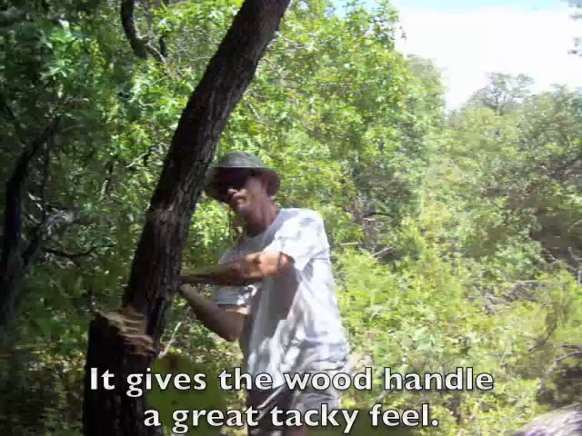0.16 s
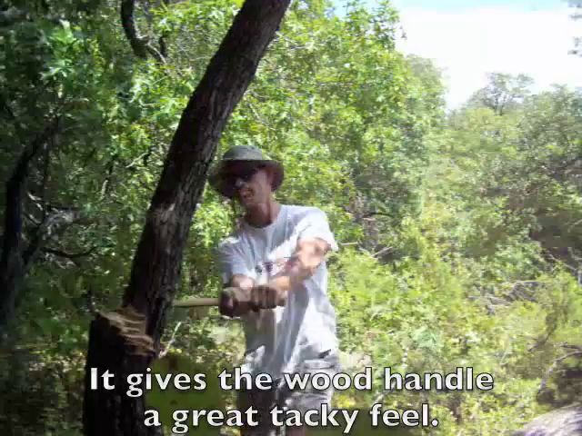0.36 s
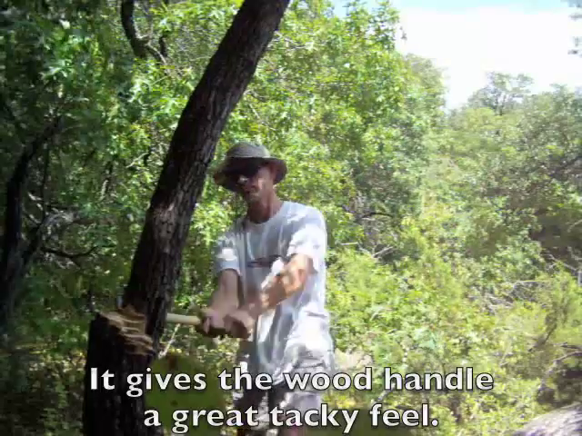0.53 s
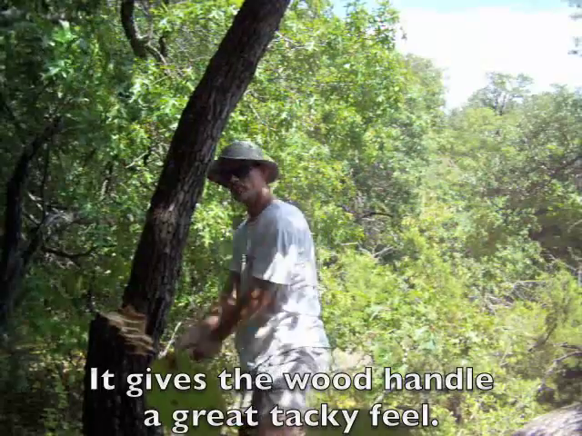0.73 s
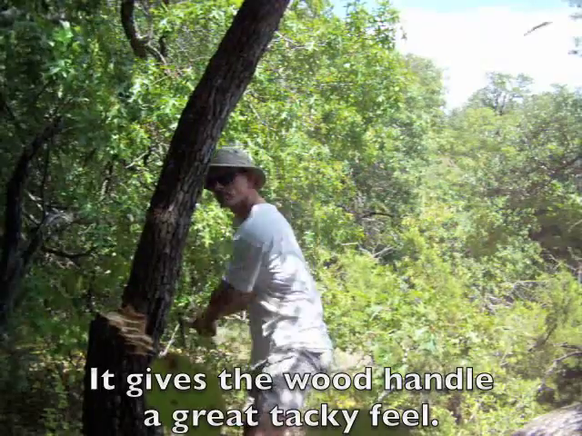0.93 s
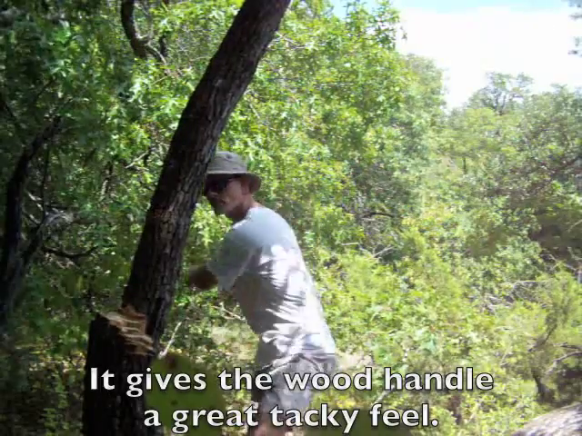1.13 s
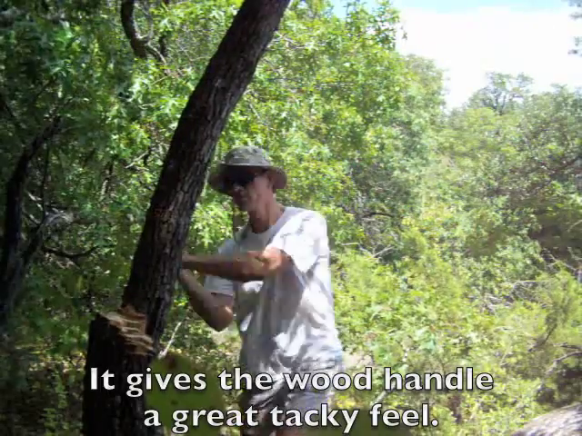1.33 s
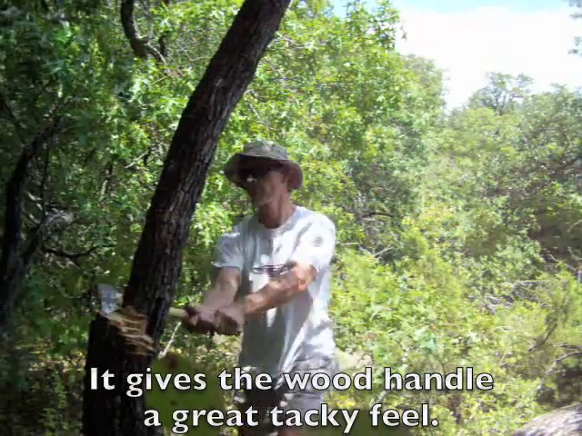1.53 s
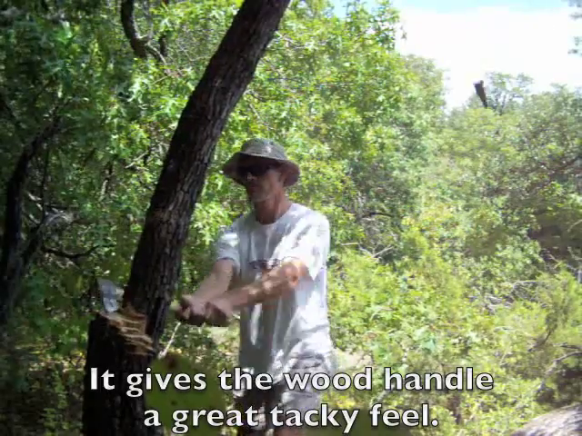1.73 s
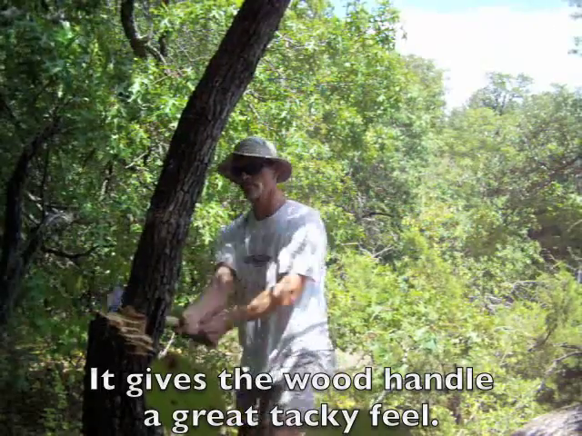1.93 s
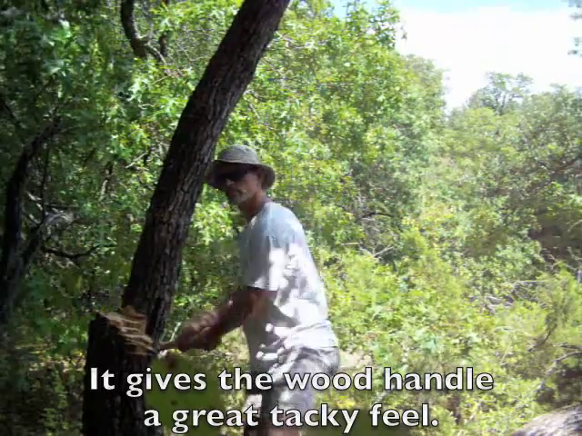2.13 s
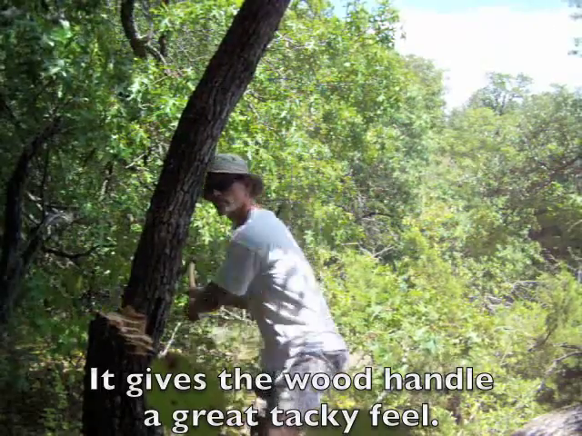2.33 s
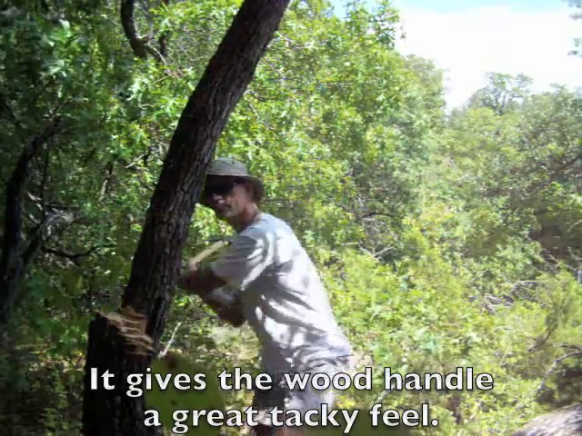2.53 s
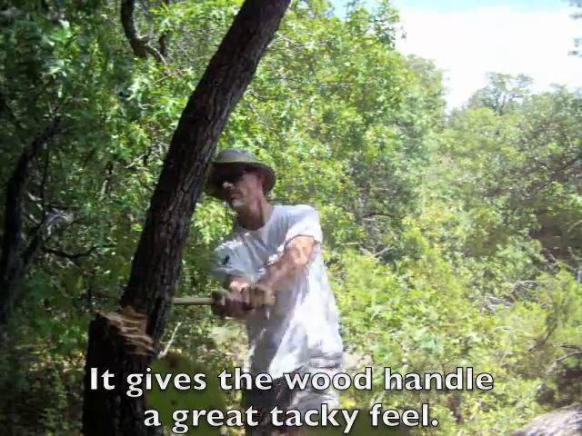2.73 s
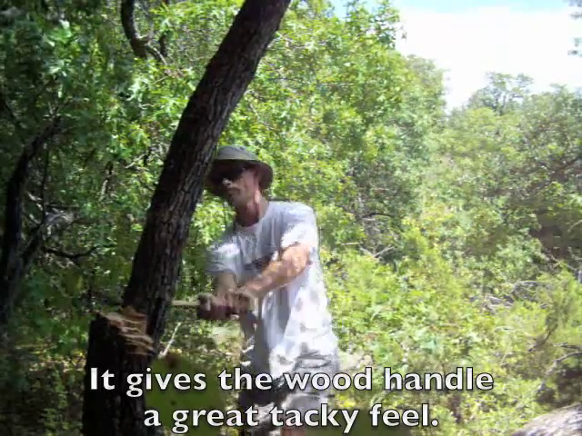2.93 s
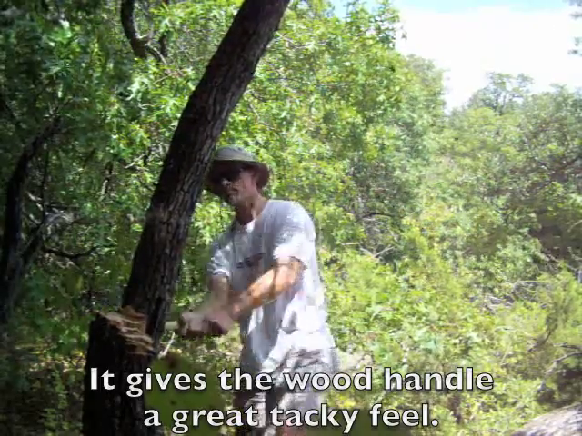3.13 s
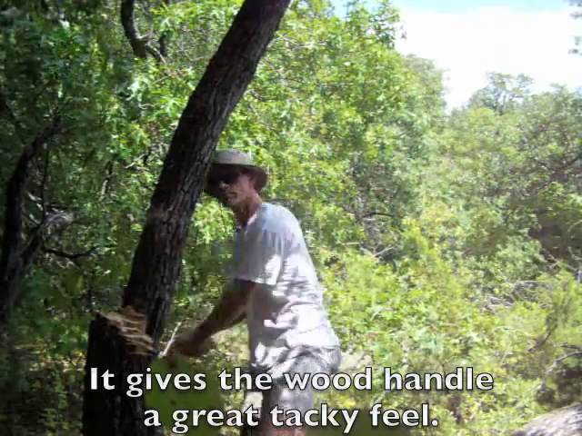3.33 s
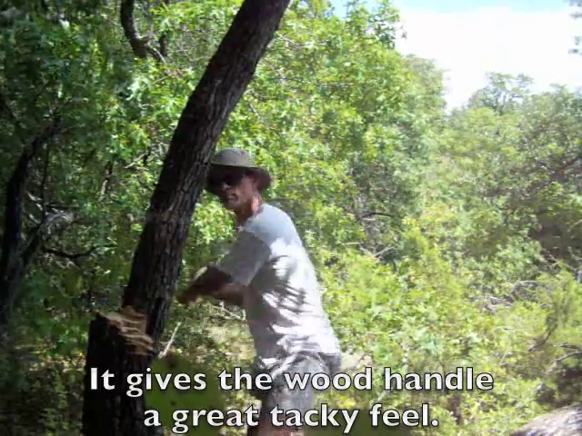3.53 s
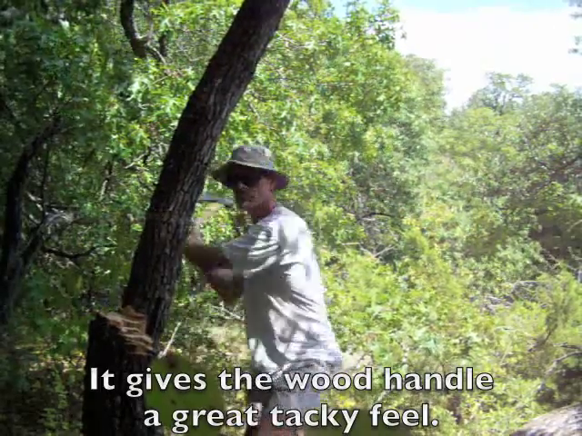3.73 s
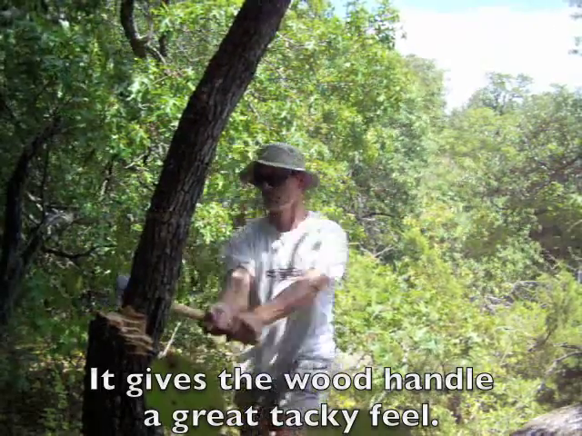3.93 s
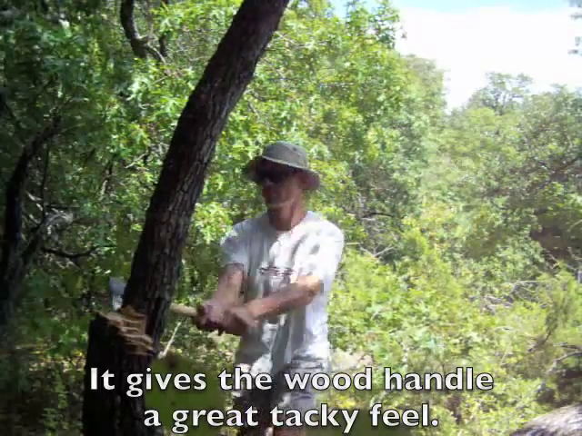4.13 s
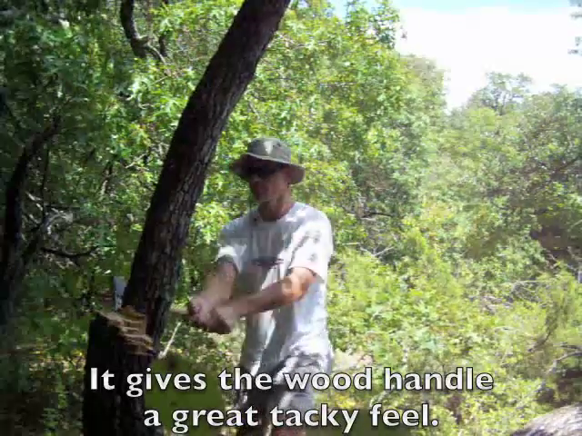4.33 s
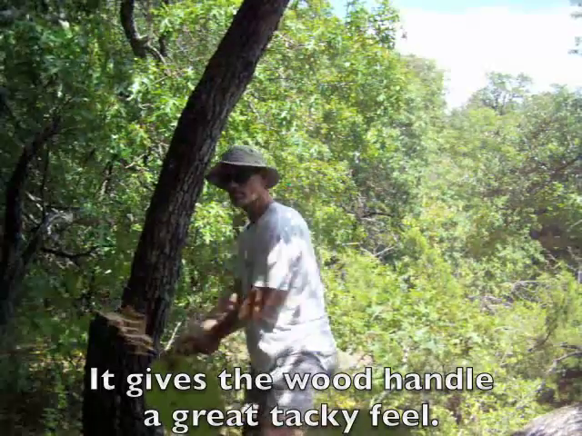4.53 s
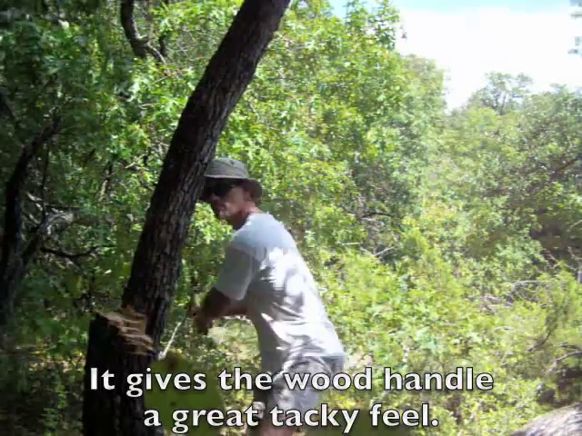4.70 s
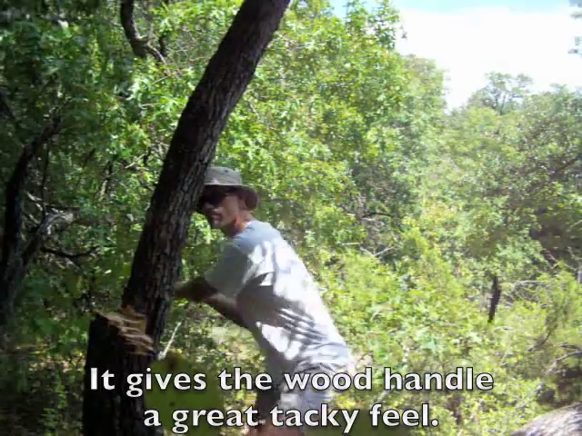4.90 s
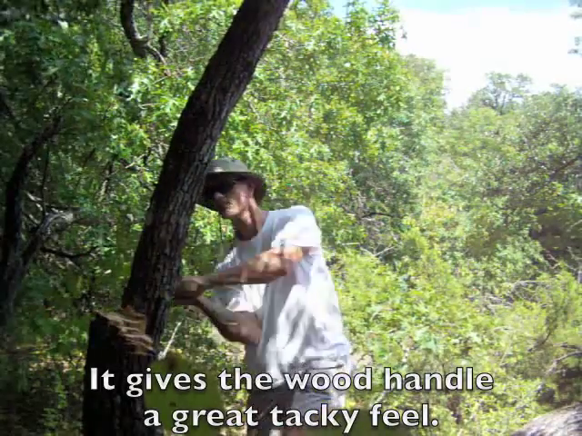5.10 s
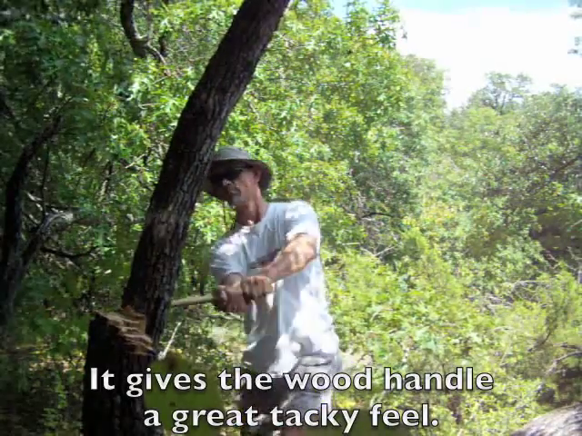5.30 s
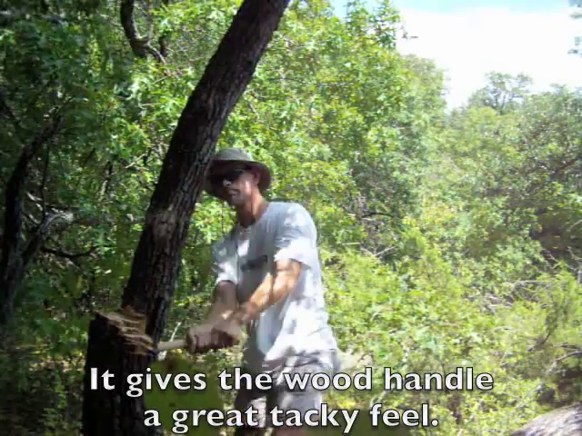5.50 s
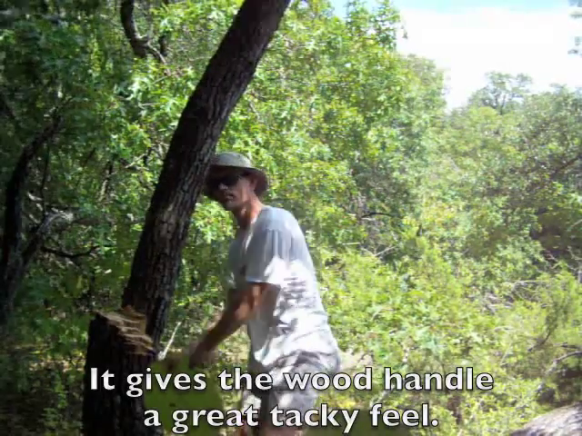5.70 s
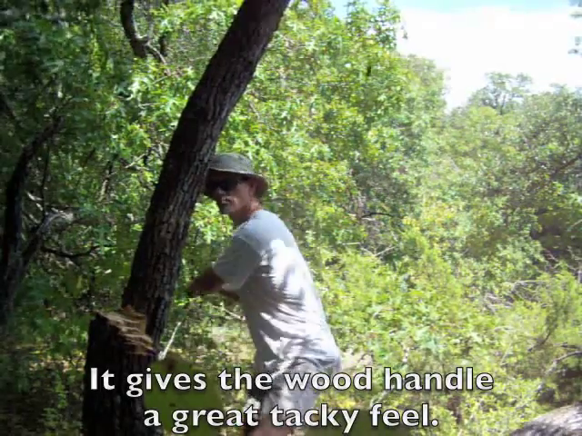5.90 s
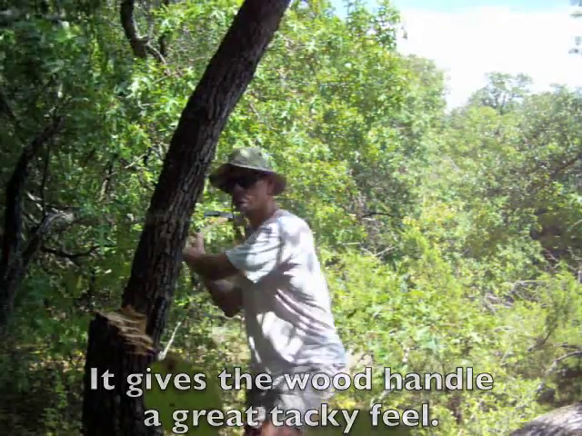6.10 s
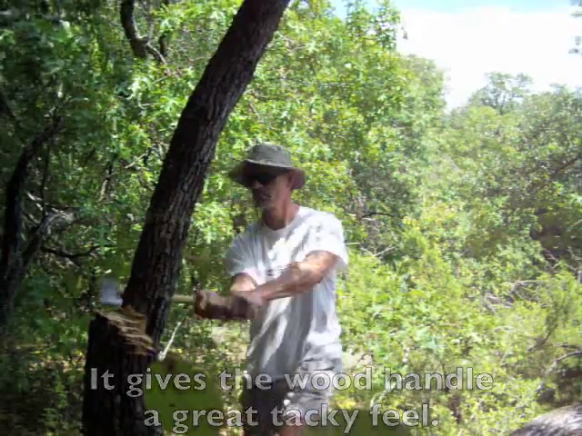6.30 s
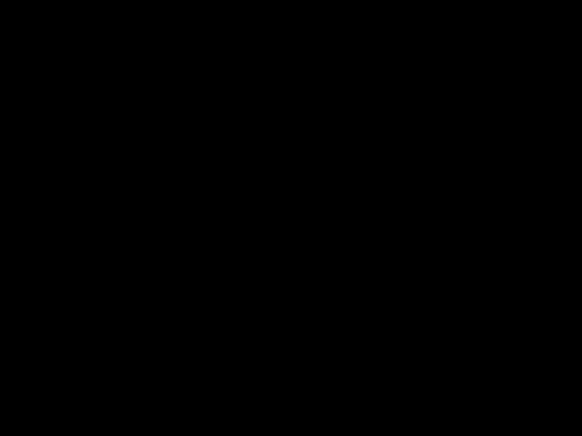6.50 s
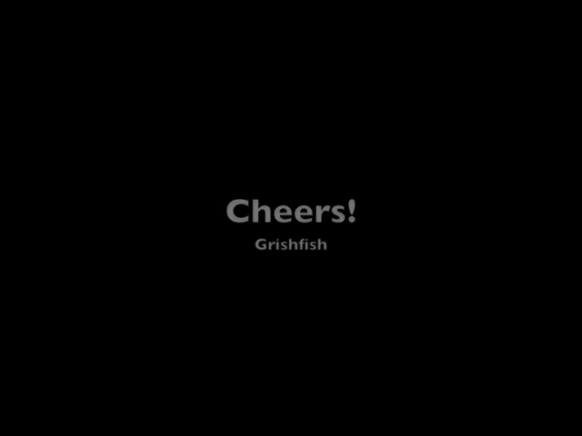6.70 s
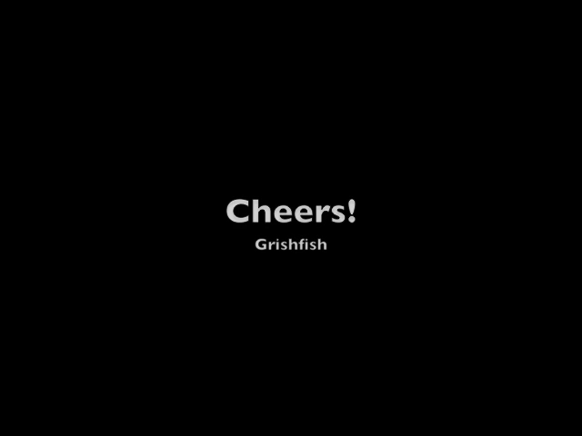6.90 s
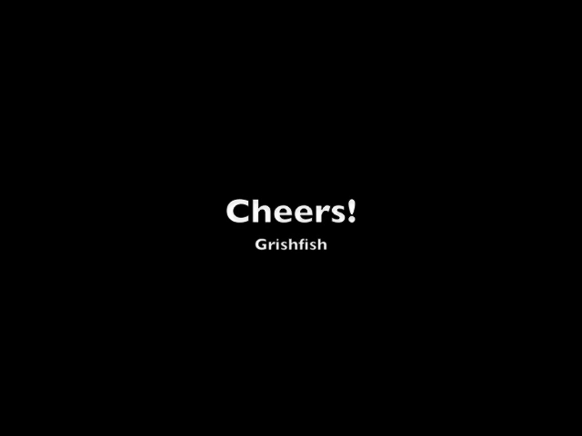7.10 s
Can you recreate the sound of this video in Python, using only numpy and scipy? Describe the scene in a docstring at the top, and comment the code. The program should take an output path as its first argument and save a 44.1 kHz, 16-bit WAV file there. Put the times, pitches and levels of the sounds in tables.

```python
"""A small axe chops a standing trunk six times in a quiet wood. Each blow cracks, shakes modes of the notch and
trunk, and returns from the trees as fading coloured noise. Around the blows, ringing ticks, mostly wood chips, and
a grainy patter fall on dry leaf litter, under steady air hush, a wavering low wind and a faint narrow chirr. One
small microphone, near enough to overload, clips the blows; its gain control ducks and recovers; a fade closes."""
import sys
import numpy as np
from scipy import signal
from scipy.fft import rfft, irfft, next_fast_len
from scipy.io import wavfile
from scipy.ndimage import uniform_filter1d

SR = 44100
rng = np.random.default_rng(int(sys.argv[2]) if len(sys.argv) > 2 else 0)


def materialize(psi):
    """Save the field psi as 16-bit PCM at rate SR to the path in sys.argv[1].

    A 1-D psi becomes a single channel; in a 2-D psi each row is a channel.
    """
    bounded = np.clip(np.atleast_2d(psi).T, -1, 1)
    quanta = np.round(bounded * 32767).astype(np.int16)
    wavfile.write(sys.argv[1], SR, quanta)


N = 315315
T = np.arange(N) / SR


def amp(db):
    """Gain of a dB value."""
    return 10 ** (np.asarray(db, float) / 20)


def rms_one(x):
    """Scaled to rms 1."""
    return x / np.sqrt(np.mean(x ** 2) + 1e-20)


def noise():
    """White noise as long as the scene."""
    return rng.standard_normal(N)


def lowpass(x, hz):
    """Second-order roll-off above hz."""
    return signal.sosfilt(signal.butter(2, hz, fs=SR, output="sos"), x)


def highpass(x, hz):
    """Second-order roll-off below hz."""
    return signal.sosfilt(signal.butter(2, hz, "high", fs=SR, output="sos"), x)


def coloured(x, spectrum):
    """x shaped by a smooth spectrum that falls away beyond its ends; rms 1."""
    hz, db = np.transpose(spectrum)
    hz = np.r_[hz[0] / 4, hz, hz[-1] * 2]
    db = np.r_[db[0] - 40, db, db[-1] - 30]
    size = next_fast_len(N)
    log_bins = np.log(np.maximum(np.arange(size // 2 + 1) * SR / size, 1))
    gains = amp(np.interp(log_bins, np.log(hz), db))
    return rms_one(irfft(rfft(x, size) * gains, size)[:N])


def ring(clicks, hz, t60_s):
    """Two-pole resonance: a unit click sets a sine of height 1 ringing, down 60 dB after t60_s."""
    radius = amp(-60 / (t60_s * SR))
    angle = 2 * np.pi * hz / SR
    return signal.lfilter([0, np.sin(angle)], [1, -2 * radius * np.cos(angle), radius ** 2], clicks + 1e-18)


def dying(starts_s, levels_db, t60_s, rise_s):
    """Sum of envelopes that rise at each time and die away."""
    out = np.zeros(N)
    t60_s = max(t60_s, .01)
    for start_s, level_db in zip(starts_s, levels_db):
        i = round(start_s * SR)
        t = T[:min(N - i, int(1.5 * t60_s * SR))]
        out[i:i + len(t)] += amp(level_db - 60 * t / t60_s) * (1 - np.exp(-t / rise_s))
    return out


def flutter(hz, depth_db):
    """Random gain that wavers about hz times a second."""
    return amp(depth_db * rms_one(lowpass(noise(), hz)))


# steady hush, spectrum before the microphone: hz, level_db (relative, per Hz)
AIR_SPECTRUM = [(25, -1), (96, 3), (170, -6.5), (350, 2.5), (570, 1.5), (1000, -2), (1800, -3), (3800, -3),
                (6000, -5.5), (7500, -17.5), (8800, -29.5)]
AIR_DB = -37


def air():
    """Steady hush of the wood and the microphone: coloured noise."""
    return amp(AIR_DB) * coloured(noise(), AIR_SPECTRUM)


WIND_HZ, WIND_DB = 220, -47.5
SHAKE_DB, SHAKE_RISE_S, SHAKE_T60_S = -30, .12, 1.1   # swell after a blow, re its boom level
OPENING_HZ, OPENING_RUMBLE_DB, OPENING_T60_S = 444, -30, 0.77


def wind():
    """Lumpy low rumble that swells as each blow shakes the ground; at first the rumble of an earlier blow dies
    away."""
    start_s, boom_db = np.transpose(AXE_BLOWS)[[0, 5]]
    level = amp(WIND_DB) + dying(start_s, boom_db + SHAKE_DB, SHAKE_T60_S, SHAKE_RISE_S)
    buffeting = level * rms_one(lowpass(noise(), WIND_HZ))
    opening_level = amp(OPENING_RUMBLE_DB - 60 * T / OPENING_T60_S)
    opening = opening_level * rms_one(lowpass(noise(), OPENING_HZ))
    return flutter(19, 3.0) * (buffeting + opening)


CHIRR_HZ, CHIRR_WIDTH_HZ, CHIRR_DB = 2350, 190, -51


def chirr():
    """A faint chirr, perhaps an insect: noise twice through one resonance, in short irregular swells."""
    b, a = signal.iirpeak(CHIRR_HZ, CHIRR_HZ / CHIRR_WIDTH_HZ, fs=SR)
    narrow = signal.lfilter(b, a, signal.lfilter(b, a, noise()))
    return amp(CHIRR_DB) * flutter(12, 4.0) * rms_one(narrow)


def grains(per_s, spread_db):
    """Random clicks of uneven size and either sign."""
    sizes = amp(spread_db * np.minimum(rng.exponential(1, N), 5)) * rng.choice([-1, 1], N)
    return sizes * (rng.random(N) < per_s / SR)


# dry leaf litter, also the colour of the axe's crack: hz, level_db (relative, per Hz)
LITTER_SPECTRUM = [(1200, -5), (2300, 0), (4200, 7), (6000, 3.5), (8000, -9)]
LEAF_CYCLES = 16   # cycles a leaf rings in falling 60 dB


def leaves(per_s, spread_db):
    """Random taps dealt to leaves of twelve sizes, each ringing briefly at its own pitch; rms 1."""
    taps = grains(per_s, spread_db)
    dealt = rng.integers(0, 12, N)
    crackle = np.zeros(N)
    for k, pitch_hz in enumerate(np.geomspace(1500, 7500, 12)):
        leaf = rms_one(ring(taps * (dealt == k), pitch_hz, LEAF_CYCLES / pitch_hz))
        crackle += flutter(15, 2.2) * leaf * np.sqrt(pitch_hz)
    return coloured(crackle, LITTER_SPECTRUM)


# fine patter of bark crumbs and shaken leaves, level drawn as a line between points: time_s, level_db
CRUMB_PATTER = [(0.0, -40.5), (0.35, -46.5), (0.52, -35.5), (0.85, -38.5), (1.1, -38.5), (2.15, -35.5),
                (2.7, -45), (3.3, -38), (4.04, -41), (4.3, -62.5), (4.52, -35), (4.9, -51), (5.1, -43),
                (6.5, -43.5)]
PATTER_PER_S, PATTER_CLUMPS_DB = 2300, 3.2


def patter():
    """Crumbs rain on the leaves in a clumped crackle."""
    time_s, level_db = np.transpose(CRUMB_PATTER)
    level = amp(np.interp(T, time_s, level_db))
    return level * flutter(25, PATTER_CLUMPS_DB) * leaves(PATTER_PER_S, 0.7)


# ticks, mostly chips landing, some the first touch or second bite of a blow; levels before the microphone:
# start_s, peak_db, pitch_hz, ring_cycles (to fall 60 dB), rustle_db
TICKS = [(0.0662, -14.5, 3220, 8.7, -38), (0.277, -24, 4450, 8, -24), (0.3009, -11, 3950, 8.8, -25.5),
         (0.3682, -4, 3570, 9, -25.5), (0.477, -14, 3660, 16, -14), (0.5144, -1, 5060, 15, -20.5),
         (0.5552, -4.5, 4830, 25, -28), (0.578, -11, 4400, 21, -17.5), (0.5932, -9, 4030, 20, -35),
         (0.618, -9.5, 3570, 61, -21), (0.671, -20, 3500, 8.8, -20), (0.782, -8, 3380, 9, -23.5),
         (0.8282, -16.5, 3220, 8, -23.5), (1.167, -12.5, 5400, 48, -20), (1.238, -14, 3070, 16, -26.5),
         (1.3104, -30, 4400, 12, -31.5), (1.344, -16, 3780, 7.3, -18), (1.3687, 0, 4100, 3.3, -15),
         (1.377, -7, 3020, 33, -27), (1.3995, -1, 1800, 20, -39), (1.4027, 1, 1320, 22, -32),
         (1.437, -17, 4100, 12, -24), (1.8005, -12, 2210, 32, -21), (1.8476, -18, 1820, 26, -30),
         (1.957, -11.5, 3700, 73, -24), (2.0323, -21, 3770, 8.2, -34), (2.1016, -14, 5000, 21, -22.5),
         (2.1842, -9.5, 2340, 6, -23), (2.321, -26, 3380, 9.5, -29.5), (2.5095, -18, 2350, 79, -31),
         (2.607, -17, 4260, 20, -25.5), (2.6524, -8, 3700, 8, -17.5), (2.8464, 10, 4300, 10, -23.5),
         (3.057, -8.5, 1550, 13, -31), (3.1625, -9.5, 1700, 49, -47), (3.3044, -20, 3490, 13, -38),
         (3.664, -7, 3460, 20, -21), (4.0027, -29, 3900, 14, -20), (4.1527, -0.5, 2280, 26, -17.5),
         (4.344, -19, 2130, 12, -23.5), (4.561, -24, 4300, 10, -27), (4.613, -13, 2890, 12, -28),
         (4.623, -16, 4130, 6.1, -25), (4.707, -19, 4500, 8, -31), (4.8788, -10.5, 5300, 58, -22.5),
         (5.0249, -20, 3900, 38, -42), (5.1087, 0, 2180, 33, -19), (5.208, -14, 4200, 12, -31),
         (5.3827, 5.5, 2360, 8.7, -24), (5.64, -17.5, 3800, 26, -32), (5.7215, -18.5, 2080, 23, -47),
         (5.7996, -10.5, 800, 6.5, -33), (5.831, -11, 4200, 18, -30), (5.867, -14, 3740, 59, -27.5),
         (6.0624, -20, 3520, 8, -35), (6.073, -11, 3980, 21, -27), (6.109, -12, 1500, 6, -28.5),
         (6.1705, -26, 4360, 13, -28.5), (6.1996, -14, 915, 13, -30.5), (6.51, 3.5, 4270, 46, -6)]
RUSTLE_T60_S = 0.099
OVERTONE, OVERTONE_DB = 1.67, -20   # second mode: pitch ratio, level for a 3.5 kHz tick
OVERTONE_DB_PER_KHZ = -5.5   # high ticks barely sound their second mode
SNAP_DB, SNAP_DB_PER_CYCLE = -8.5, -0.3   # long-ringing ticks have less snap
TICK_SAMPLES = 1500


def ticks():
    """Ticks, mostly chips landing: a snap, a ring at two pitches and a rustle of leaves."""
    start_s, peak_db, pitch_hz, ring_cycles, rustle_db = np.transpose(TICKS)
    out = dying(start_s, rustle_db, RUSTLE_T60_S, 0.00033) * leaves(3600.0, 0.8)
    # a short uneven contact
    jolts = rng.standard_normal((len(start_s), TICK_SAMPLES)) * np.exp(-T[:TICK_SAMPLES] / .0006)
    for start, db, pitch, cycles, jolt in zip(start_s, peak_db, pitch_hz, np.maximum(ring_cycles, 2), jolts):
        high = min(OVERTONE * pitch, .2 * SR)
        overtone_db = OVERTONE_DB + OVERTONE_DB_PER_KHZ * (pitch / 1000 - 3.5)
        tick = rms_one(ring(jolt, pitch, cycles / pitch))
        tick += amp(overtone_db) * rms_one(ring(jolt, high, cycles / high))
        tick += amp(SNAP_DB + SNAP_DB_PER_CYCLE * cycles) * rms_one(ring(jolt, 2300, 0.0042))   # broad snap
        tick = np.diff(tick, prepend=0)   # a small body radiates little bass
        i = round(start * SR)
        out[i:i + TICK_SAMPLES] += amp(db) * tick / np.max(np.abs(tick))
    return out


SPLINTER_T60_S = .018   # fibres go on snapping briefly after the edge stops
TEAR_DB, TEAR_T60_S = -18, 0.15   # the torn chip creaks loose after the blow


def contact(starts_s, levels_db, lengths_ms):
    """Envelopes that hold while the edge drives in, drop quickly, then trail off."""
    out = np.zeros(N)
    for start_s, level_db, length_ms in zip(starts_s, levels_db, lengths_ms):
        after_s = np.maximum(T - start_s - length_ms / 1000, 0)
        fall = amp(-60 * after_s / SPLINTER_T60_S) + amp(TEAR_DB - 60 * after_s / TEAR_T60_S)
        out += amp(level_db) * fall * np.clip((T - start_s) / .0005, 0, 1)
    return out


# axe blows, levels before the microphone: start_s, crack_db, thud_db, knock_db, contact_ms, boom_db,
# dull_echo_db, middle_echo_db, bright_echo_db
AXE_BLOWS = [(0.3727, 8.5, -18.5, -15.5, 4.3, -9, -15, -26.5, -10),
             (1.5814, 7.5, -18, -24.5, 4.9, -14.5, -19, -21.5, -13),
             (2.8290, 4.5, -9.5, -11, 10.6, -11, -4, -10, -13),
             (4.055, 8, -13.5, -15, 8.3, -12.5, -14, -10.5, -14.5),
             (5.263, 10.5, -14, -8, 7.3, -7.5, -9.5, -12, -9),
             (6.4240, 2.5, -11.5, -9, 12.7, -9.5, -12, -14.5, -13)]
# modes of the wood round the notch, thudding below 700 Hz and knocking above: pitch_hz, level_db, t60_ms
NOTCH_MODES = [(263, -8.5, 30), (414, -7, 18), (480, 1.5, 29), (562, -1, 16), (662, -4, 19),
               (780, -14.5, 11), (880, 4.5, 10), (1200, -11, 26), (1201, 2, 6.6), (1620, 1, 9.4),
               (1890, -1, 8.6), (2263, -8.5, 26), (3500, -3.5, 6.8)]
CRACK_DELAY_S = .0015   # fibres split just after the edge lands


def axe():
    """Splitting fibres crack while the edge bites in a burst of jolts that shake the notch modes."""
    start_s, crack_db, thud_db, knock_db, contact_ms = np.transpose(AXE_BLOWS)[:5]
    out = contact(start_s + CRACK_DELAY_S, crack_db, contact_ms) * coloured(noise(), LITTER_SPECTRUM)
    jolts = noise()
    thud = contact(start_s, thud_db, contact_ms) * jolts
    knock = contact(start_s, knock_db, contact_ms) * jolts
    for pitch_hz, level_db, t60_ms in NOTCH_MODES:
        shake = thud if pitch_hz < 700 else knock
        out += amp(level_db) * ring(shake, pitch_hz, t60_ms / 1000)
    return highpass(out, 300)   # the blow itself carries little bass below 300 Hz


THUMP_DB, THUMP_HZ, THUMP_T60_S = -2.5, 80, 0.07   # level re the blow's boom


def thump():
    """A short soft low thump under each clipped blow: a click rings a damped resonance."""
    start_s, boom_db = np.transpose(AXE_BLOWS)[[0, 5]]
    clicks = np.zeros(N)
    clicks[np.round(start_s * SR).astype(int)] = amp(boom_db + THUMP_DB)
    return ring(clicks, THUMP_HZ, THUMP_T60_S)


# low booming modes of the whole trunk, before a 190 Hz low-pass: pitch_hz, width_hz, level_db
TRUNK_MODES = [(47.3, 26, -11), (92.8, 8, -1), (147.5, 12, -1.5), (188, 20, -6)]
BOOM_T60_S = 0.46
BOOM_DELAY_S = 0.023   # the low boom comes up shortly after each blow


def trunk():
    """The trunk and roots boom on after the blow: noise in its low modes."""
    start_s, boom_db = np.transpose(AXE_BLOWS)[[0, 5]]
    boom = np.zeros(N)
    for pitch_hz, width_hz, level_db in TRUNK_MODES:
        t60_s = np.log(1000) / np.pi / width_hz
        boom += amp(level_db) * rms_one(ring(noise(), pitch_hz, t60_s))
    return dying(start_s + BOOM_DELAY_S, boom_db, BOOM_T60_S, 0.035) * lowpass(boom, 190)


# echo colours, from ground and trunks (dull) up to foliage (bright): hz, level_db (relative, per Hz)
DULL_SPECTRUM = [(180, -18.5), (300, -16), (470, -5), (620, 2), (760, -7), (900, -2.5), (1200, -7.5),
                 (1500, -9), (3000, -20.5)]
MIDDLE_SPECTRUM = [(500, -24), (850, -3.5), (1100, 4), (1600, -1), (2300, 2), (2900, -2.5), (7000, -21.5)]
BRIGHT_SPECTRUM = [(1000, -10.5), (2500, -13), (3900, 4), (5500, 2), (8000, -16.5)]
# build-up and decay of the echoes, rows dull, middle, bright: t60_s, rise_s
ECHO_DECAYS = [(0.72, 0.21), (0.72, 0.018), (0.55, .01)]
ECHO_FLUTTER_DB = 1.5


def echoes():
    """Scattered, uneven returns: dull noise builds slowly off ground and trunks, bright quickly off foliage."""
    start_s, levels_db = np.transpose(AXE_BLOWS)[0], np.transpose(AXE_BLOWS)[6:]
    spectra = (DULL_SPECTRUM, MIDDLE_SPECTRUM, BRIGHT_SPECTRUM)
    out = np.zeros(N)
    for level_db, spectrum, (t60_s, rise_s) in zip(levels_db, spectra, ECHO_DECAYS):
        envelope = dying(start_s, level_db, t60_s, rise_s)
        out += envelope * flutter(30, ECHO_FLUTTER_DB) * coloured(noise(), spectrum)
    return out


def scene():
    """All sources reach one microphone."""
    quiet_wood = air() + wind() + chirr() + patter() + ticks()
    blows = axe() + thump() + trunk() + echoes()
    return (quiet_wood + blows)[None]


MIC_LOW_HZ, MIC_CUT_HZ, CUTOFF_HZ = 34.3, 5290, 9250   # bass roll-off, treble roll-off, steep upper limit
DUCK_ABOVE_DB, DUCK_RATIO = -11, 0.48   # ratio: dB of cut per dB over the threshold
ATTACK_S, RELEASE_DB_S = 0.0027, 46   # smoothing time, recovery in dB per second
CLIP = .68   # overload amplitude
FADE_START_S, FADE_END_S, FADE_POWER = 6.51, 6.597, 1.34


def record(dry):
    """Gain control ducks too late for the blows, which clip; bass and treble roll off; a fade closes."""
    thin = highpass(dry, MIC_LOW_HZ)
    level_db = 10 * np.log10(uniform_filter1d(thin[0] ** 2, size=132) + 1e-12)   # 3 ms mean power
    cut_db = np.maximum(level_db - DUCK_ABOVE_DB, 0) * DUCK_RATIO
    # each peak in the cut is let go at the release rate
    held_db = np.maximum.accumulate(cut_db + RELEASE_DB_S * T) - RELEASE_DB_S * T
    lag = np.exp(-1 / (ATTACK_S * SR))
    smooth_cut_db = signal.lfilter([1 - lag], [1, -lag], np.maximum(held_db, 0))
    clipped = np.clip(thin * amp(-smooth_cut_db), -CLIP, CLIP)
    soft = signal.sosfilt(signal.butter(3, MIC_CUT_HZ, fs=SR, output="sos"), clipped)
    fade = np.clip((FADE_END_S - T) / (FADE_END_S - FADE_START_S), 0, 1) ** FADE_POWER
    return signal.sosfilt(signal.cheby2(8, 28, CUTOFF_HZ, fs=SR, output="sos"), soft * fade)


dry = scene()
out = record(dry)
materialize(out)
```